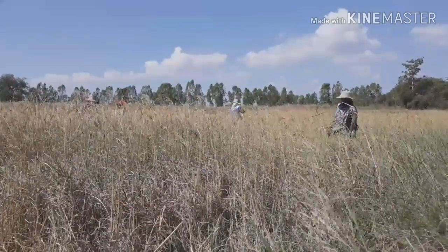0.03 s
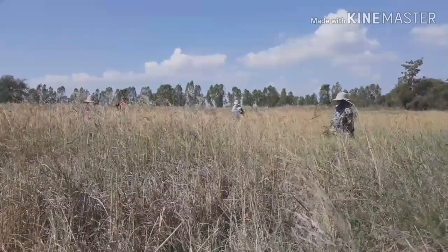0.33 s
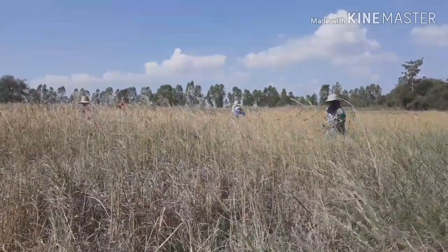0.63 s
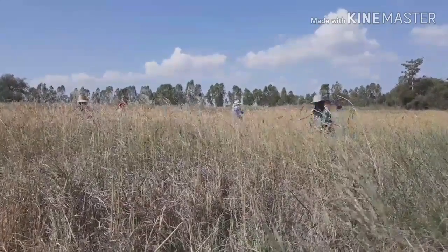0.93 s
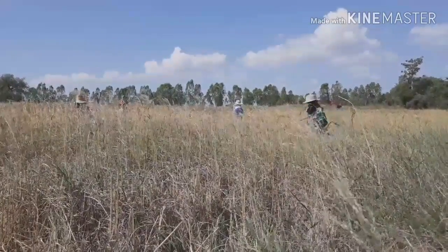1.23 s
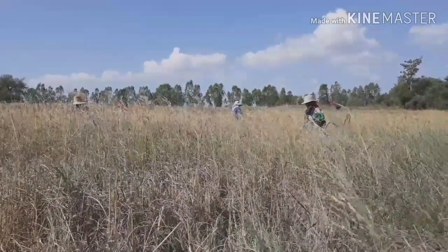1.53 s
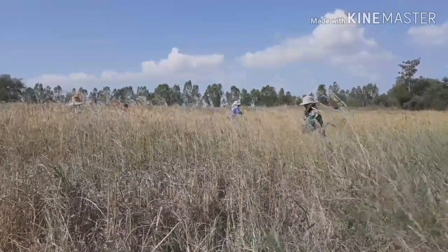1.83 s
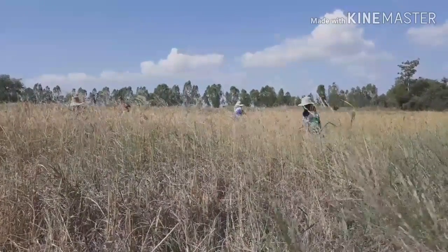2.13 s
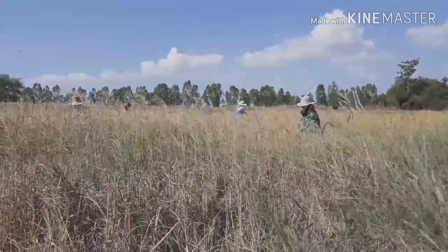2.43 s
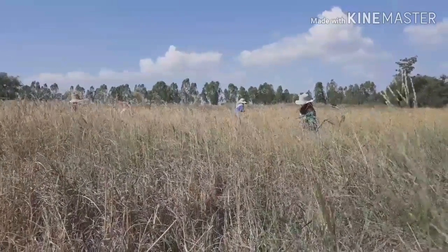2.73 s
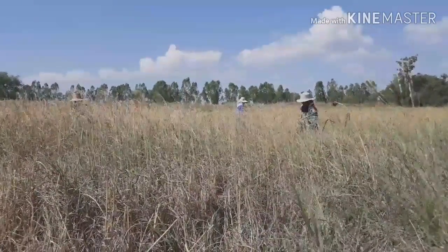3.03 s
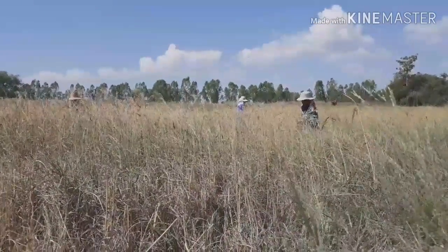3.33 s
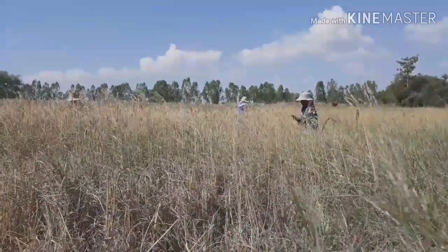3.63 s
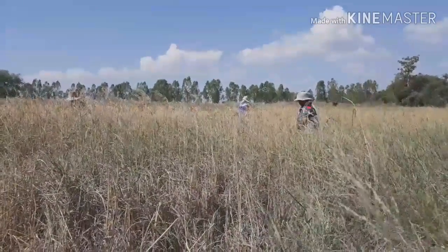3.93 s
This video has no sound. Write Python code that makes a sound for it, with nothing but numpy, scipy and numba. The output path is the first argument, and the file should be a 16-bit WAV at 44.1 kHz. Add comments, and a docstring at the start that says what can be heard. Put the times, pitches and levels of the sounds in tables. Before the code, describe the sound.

A low wind rumble thuds against the microphone, swelling early, dropping into a lull and picking up again. Behind it, a field of dry grass rustles quietly throughout, with occasional swishes and a few faint ticks.

```python
"""A low, gusty rumble of wind on the microphone, in an open field of dry rice.
Eddies buffet the microphone; the rumble reaches higher as the gust grows and almost dies
in a lull. Behind it the dry stalks hiss steadily, swish now and then as they brush
together, and give a few tiny snaps."""
import sys
import numpy as np
from scipy import signal
from scipy.fft import rfft, irfft
from scipy.io import wavfile
from scipy.ndimage import uniform_filter1d
from numba import njit

SR = 44100
rng = np.random.default_rng(int(sys.argv[2]) if len(sys.argv) > 2 else 0)


def log_audio(samples):
    """Write samples as a 16-bit WAV file to the path given in sys.argv[1]."""
    # one column per channel
    frames = np.atleast_2d(samples).T
    # limit to full scale, then quantise
    limited = np.clip(frames, -1, 1)
    pcm = np.round(limited * 32767).astype(np.int16)
    wavfile.write(sys.argv[1], SR, pcm)


N = 176400

# Each row: time in seconds, base rumble level in dB, base low-pass edge in Hz.
GUSTS = [(0, -31.5, 565), (.27, -29, 517), (.41, -32, 323), (.5, -26.5, 497), (.67, -30.5, 500),
         (.75, -21.5, 760), (.85, -25, 583), (.92, -22, 740), (1.0, -32.5, 496), (1.08, -26, 570),
         (1.2, -29, 580), (1.31, -31.5, 476), (1.41, -23.5, 720), (1.5, -27.5, 610), (1.56, -35.5, 496),
         (1.82, -28.5, 464), (2.1, -38, 328), (2.3, -35.5, 353), (2.37, -42.5, 314), (2.5, -38, 250),
         (2.56, -53.5, 160), (2.66, -59.5, 150), (2.73, -45, 173), (2.83, -58, 153), (3.05, -50, 150),
         (3.13, -62.5, 163), (3.38, -62, 170), (3.41, -37.5, 258), (3.5, -33.5, 250), (3.58, -46, 218),
         (3.68, -31, 260), (3.81, -39, 241), (3.87, -26, 288), (3.91, -37, 322), (4.0, -55, 172)]
# Rumble before the low-pass. Each row: frequency in Hz, relative level in dB.
RUMBLE_SPECTRUM = [(15, -16), (50, -7.5), (90, -0.1), (160, 1.07), (280, -6), (500, -16), (900, -26),
                   (2000, -48)]
# Each row: start in seconds, length in seconds, lift in dB, extra edge shift in octaves.
STRONG_BUFFETS = [(0.302, 0.036, 13.5, 0.29), (0.706, 0.015, 9.5, -1.1), (0.747, 0.013, 7.5, 0.56),
                  (0.77, 0.0085, 11.5, 0.011), (0.808, 0.016, 7.5, -0.13), (.942, 0.013, 12, .6),
                  (1.021, 0.011, 12, -0.35), (1.057, 0.015, 10.5, -0.34), (1.077, 0.013, 11.5, 0.36),
                  (1.149, 0.019, 7, -0.64), (1.248, 0.0085, 16, 0.8), (1.259, 0.016, 13, -0.28),
                  (1.353, 0.029, 7, 0.38), (1.397, 0.033, 8.5, -0.46), (1.439, 0.0098, 9, 0.053),
                  (1.518, 0.019, 11, 0.064), (1.67, 0.0173, 7, 0.13), (2.036, 0.032, 10, -0.66),
                  (2.129, 0.021, 16, 0), (2.217, 0.026, 12.5, 0.24), (2.293, 0.015, 9.5, -0.087),
                  (2.99, .022, 12.5, -0.39), (3.44, 0.023, 8.5, -0.057), (3.48, 0.015, 9, 0.31),
                  (3.837, 0.019, 7, 0.033)]
# Each row: frequency in Hz, relative level in dB.
HISS_SPECTRUM = [(100, 6.5), (430, -10), (750, -0.5), (1200, -2.5), (1900, 0.5), (2800, -4), (3500, 3),
                 (4300, 4.5), (5300, -4), (6300, 0), (7000, -2), (7900, 2), (9500, -4), (11500, -5.5),
                 (13800, -3), (15300, -7)]
# Each row: time in seconds, base hiss level in dB.
HISS_LEVELS = [(0, -48), (.9, -50.5), (1.55, -49), (2.3, -51.5), (2.67, -48.5), (3.0, -52.5), (3.4, -51),
               (4, -49)]
# Each row: start, attack and release in seconds, base level in dB, tilt in dB per octave,
# rasp centre in Hz, rasp boost in dB.
STALK_SWISHES = [(.07, .061, 0.11, -54.5, 6, 6200, 3), (.25, 0.11, .28, -47.5, 2, 6200, 0),
                 (.65, 0.13, 0.075, -48.5, -2, 3600, 0), (1.19, .21, 0.098, -49, 3, 8200, 3),
                 (1.614, 0.038, 0.21, -46, 1.5, 4400, 8), (1.85, 0.15, 0.12, -52, 0, 4340, 1),
                 (2.55, 0.045, 0.14, -49, -0.8, 4100, 2.5), (3.2, 0.089, 0.36, -54, 3, 1450, 12)]
# Each row: frequency in Hz, relative level in dB.
SWISH_SPECTRUM = [(400, -6.5), (1000, -7), (2750, -5.5), (3500, 0), (4300, 1), (5200, -15), (6200, -2),
                  (7000, -6.5), (8000, -1), (9300, -11.5), (13000, -11), (15500, -28)]
# Drifting dip in the rustle's spectrum. Each row: time in seconds, centre in Hz.
RUSTLE_NOTCH = [(0, 2620), (1.0, 2800), (1.7, 2900), (2.3, 2880), (3.1, 3020), (3.6, 3330), (4, 3080)]
# Each row: start in seconds, rough peak in dB, pitch in Hz, bandwidth in Hz, decay in seconds.
STALK_SNAPS = [(.405, -32.5, 8300, 3500, .004), (1.628, -38, 6750, 4000, .0047),
               (3.752, -31, 14900, 1800, .0016)]


def undb(db):
    """Decibels to gain."""
    return 10 ** (np.asarray(db) / 20)


def unit(x):
    """Scale to rms 1."""
    return x / np.sqrt(np.mean(x ** 2))


def colour(x, points, tilt_db_per_octave=0):
    """Shape by (Hz, dB) points and a tilt; rms 1."""
    hz, db = np.array(points, float).T
    octave = np.log2(np.maximum(np.fft.rfftfreq(N, 1 / SR), 1))
    tilt_db = tilt_db_per_octave * np.clip(octave - np.log2(hz[0]), 0, None)
    gain = undb(np.interp(octave, np.log2(hz), db) + tilt_db)
    return unit(irfft(rfft(x) * gain, N))


def walk(rate_hz):
    """Smooth random wander; rms 1."""
    hold = max(int(SR / rate_hz), 1)
    steps = rng.standard_normal(N)[np.arange(N) // hold]
    return unit(uniform_filter1d(uniform_filter1d(steps, hold), hold))


def curve(t, table, column=1):
    """One table column, linearly interpolated in time."""
    rows = np.array(table, float)
    return np.interp(t, rows[:, 0], rows[:, column])


@njit
def svf(x, hz, damping):
    """State-variable filter with a moving centre: (low-pass, band-pass)."""
    y, band, low = np.empty((2, len(x))), 0., 0.
    for i in range(len(x)):
        g = np.tan(np.pi * hz[i] / SR)
        v = (band + g * (x[i] - low)) / (1 + g * (g + damping))
        y[0, i], y[1, i] = low + g * v, damping * v
        band, low = 2 * v - band, low + 2 * g * v
    return y


def wind_buffeting(t, eddy_db=3, attack_s=0.00395, release_s=0.01075, lift_db_per_octave=27):
    """Turbulence at the microphone port: stronger eddies are louder and brighter; buffets thud or slap."""
    lift_db = eddy_db * walk(rate_hz=75)
    shift_octaves = np.zeros(N)
    for start_s, length_s, db, octaves in STRONG_BUFFETS:
        rise = (t - start_s) / attack_s
        fall = (start_s + length_s - t) / release_s + .5
        push = np.clip(np.minimum(rise, fall), 0, 1)
        lift_db = lift_db * (1 - push) + db * push
        shift_octaves += octaves * push
    shift_octaves += lift_db / lift_db_per_octave
    edge_hz = np.clip(curve(t, GUSTS, column=2) * 2 ** shift_octaves, 100, 3000)
    air = colour(rng.standard_normal(N), RUMBLE_SPECTRUM)
    for _ in range(2):
        air = svf(air, edge_hz, damping=2.34)[0]
    running_rms = np.sqrt(uniform_filter1d(air ** 2, int(0.0172 * SR)))
    return air / running_rms * undb(curve(t, GUSTS) + lift_db + 0.3)


def field_hiss(t, sway_db=0.86):
    """Countless distant stalks merge into a softly swaying hiss."""
    hiss = colour(rng.standard_normal(N), HISS_SPECTRUM)
    return hiss * undb(curve(t, HISS_LEVELS) + sway_db * walk(rate_hz=6.94))


def stalk_swishes(t, contacts_per_s=12000, spread_db=1.7, flutter_db=1.5):
    """Near stalks brush together: dense tiny contacts swell and fade, each swish with its own rasp."""
    out = np.zeros(N)
    for start_s, attack_s, release_s, db, tilt_db_per_octave, rasp_hz, rasp_db in STALK_SWISHES:
        hits = rng.random(N) < contacts_per_s / SR
        contacts = hits * rng.standard_normal(N) * undb(spread_db * rng.exponential(size=N))
        rasp_band = svf(contacts, np.full(N, float(rasp_hz)), damping=0.45)[1]
        rasp = (undb(rasp_db) - 1) * rasp_band
        peak_s = start_s + attack_s
        swell = np.interp(t, [start_s, peak_s, peak_s + release_s], [0, 1, 0]) ** 0.36
        out += colour(contacts + rasp, SWISH_SPECTRUM, tilt_db_per_octave) * swell * undb(db)
    return out * undb(flutter_db * walk(rate_hz=44.32))


def stalk_snaps(t):
    """A dry stalk cracks: a few milliseconds of noise around its own pitch."""
    out = np.zeros(N)
    bins_hz = np.fft.rfftfreq(N, 1 / SR)
    for start_s, peak_db, pitch_hz, width_hz, decay_s in STALK_SNAPS:
        resonance = 1 / (1 + (2 * (bins_hz - pitch_hz) / width_hz) ** 2)
        crack = unit(irfft(rfft(rng.standard_normal(N)) * resonance, N))
        envelope = (t >= start_s) * np.exp(-np.abs(t - start_s) / decay_s)
        out += crack * envelope * undb(peak_db) / 2  # noise peaks near twice its rms
    return out


def scene(notch_depth=0.61):
    """Wind on the microphone in front of the rustling field; mono."""
    t = np.arange(N) / SR
    rustle = field_hiss(t) + stalk_swishes(t)
    rustle -= notch_depth * svf(rustle, curve(t, RUSTLE_NOTCH), damping=0.52)[1]
    return (wind_buffeting(t) + rustle + stalk_snaps(t))[None]


def record(dry, bass_cut_hz=63.0, treble_cut_hz=15600):
    """The microphone rolls off the deep bass; the recorder cuts the top treble."""
    low, band = svf(dry[0], np.full(N, bass_cut_hz), damping=1.48)
    high_passed = dry - low - band
    treble_cut = signal.ellip(12, .1, 80, treble_cut_hz, fs=SR, output="sos")
    return signal.sosfilt(treble_cut, high_passed)


dry = scene()
out = record(dry)
log_audio(out)
```